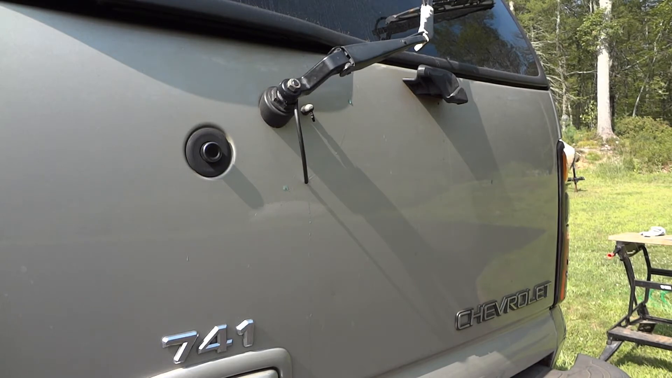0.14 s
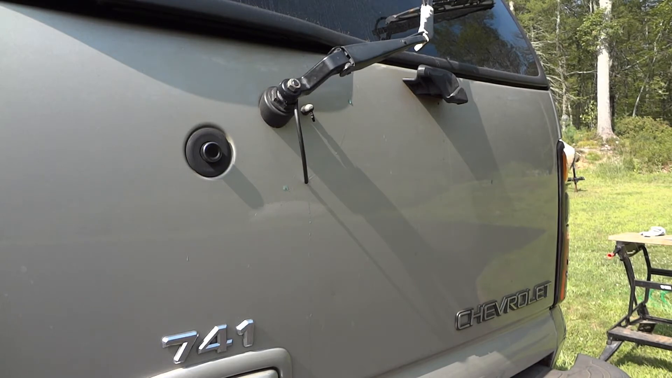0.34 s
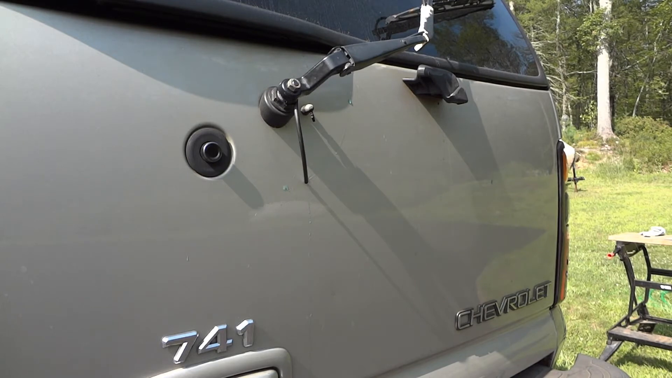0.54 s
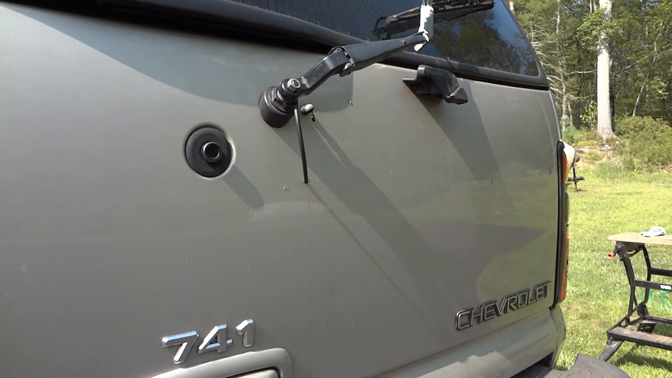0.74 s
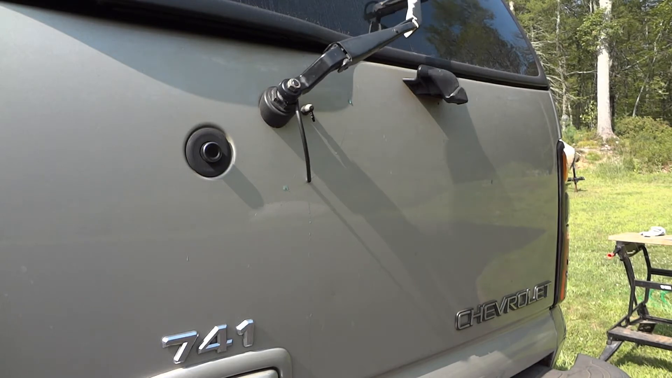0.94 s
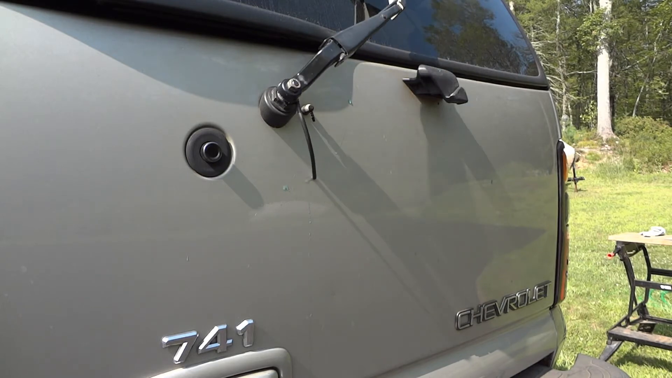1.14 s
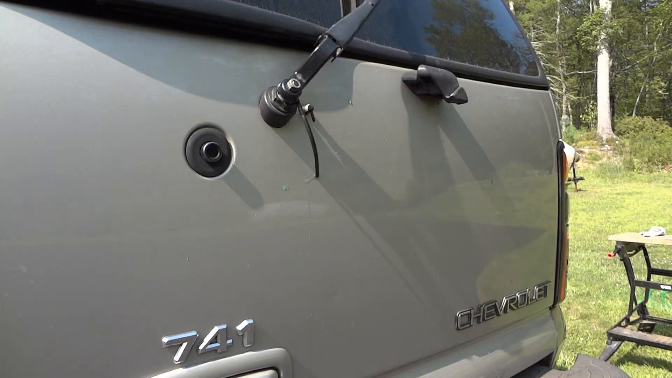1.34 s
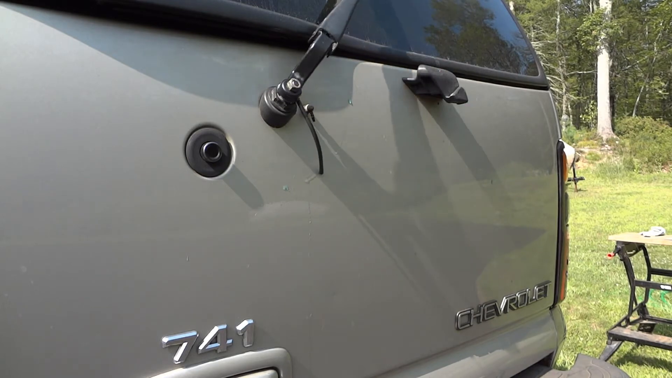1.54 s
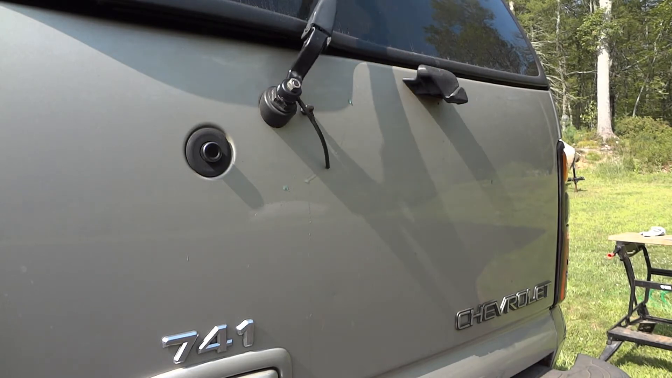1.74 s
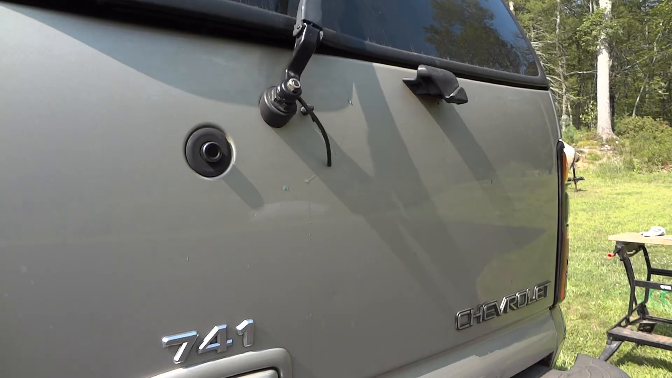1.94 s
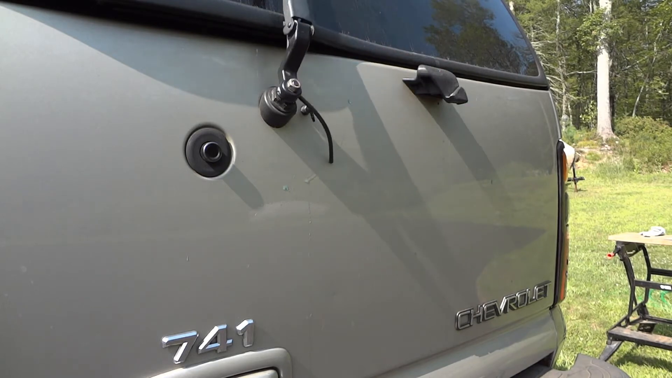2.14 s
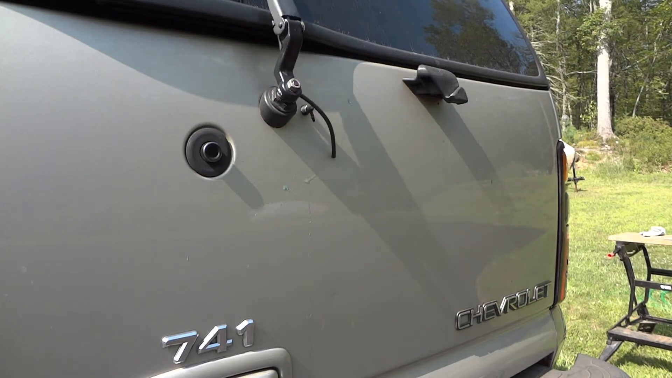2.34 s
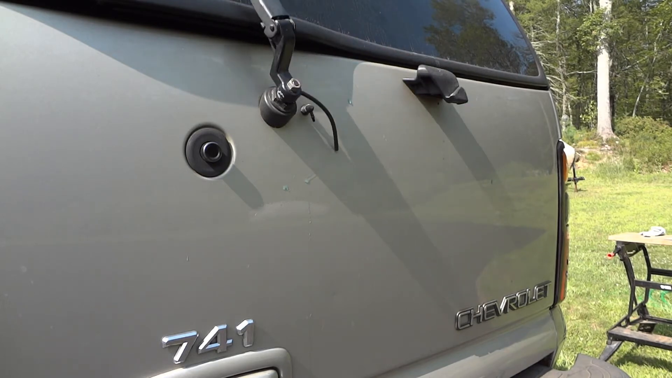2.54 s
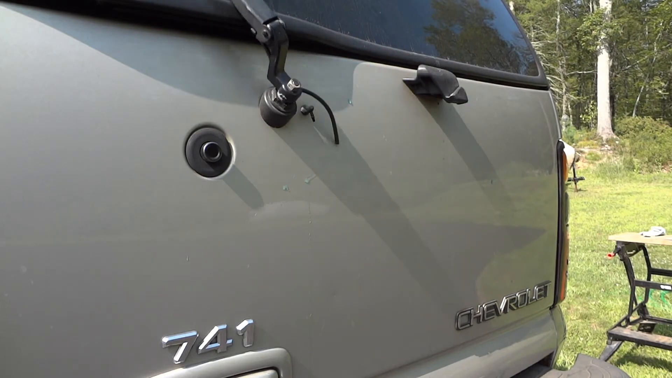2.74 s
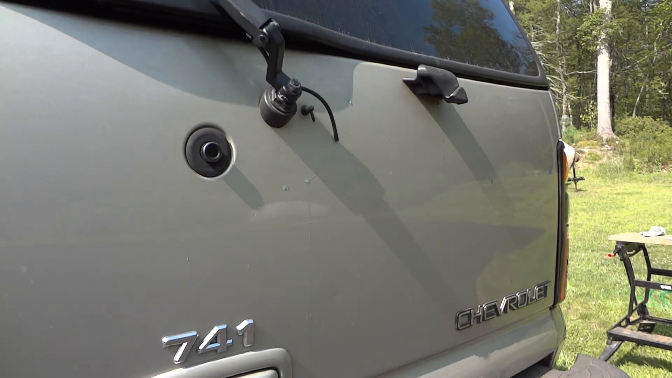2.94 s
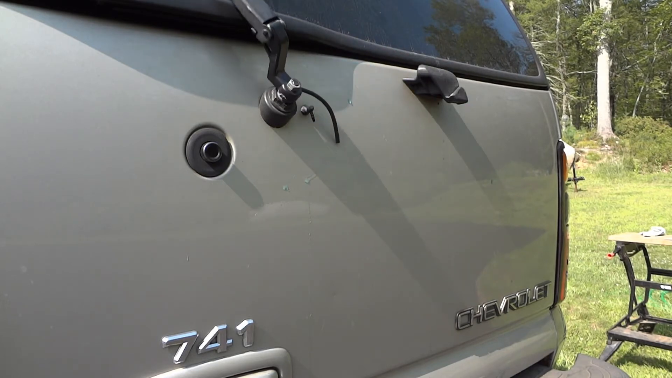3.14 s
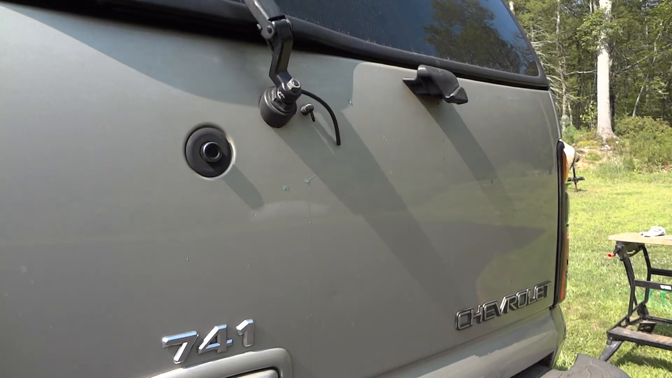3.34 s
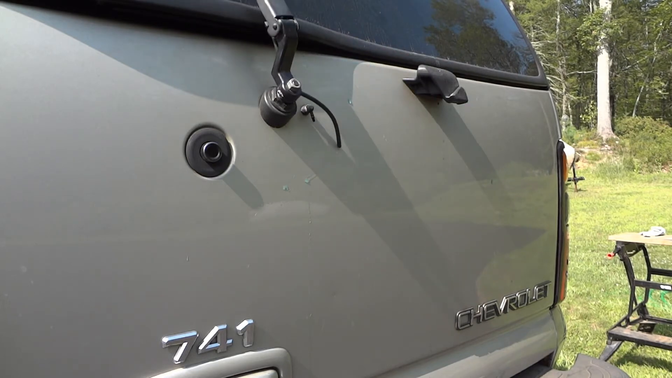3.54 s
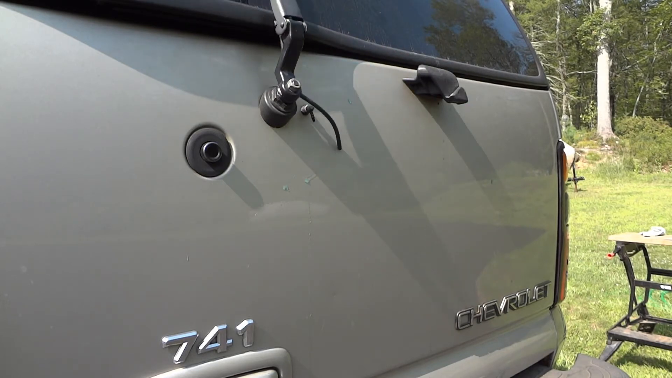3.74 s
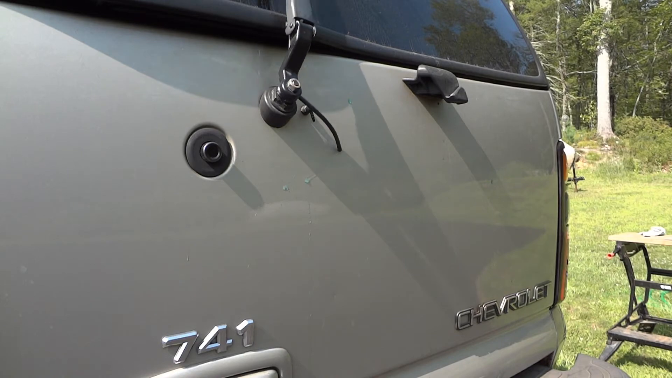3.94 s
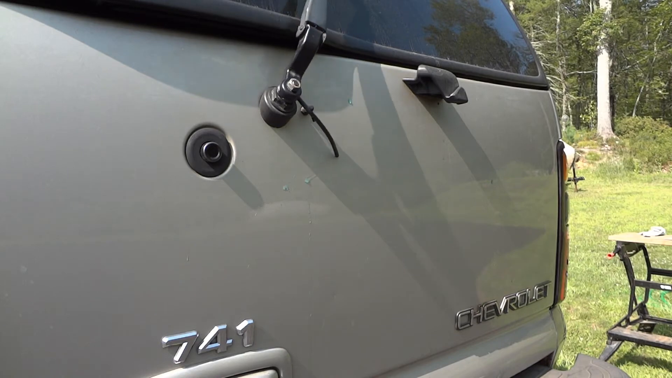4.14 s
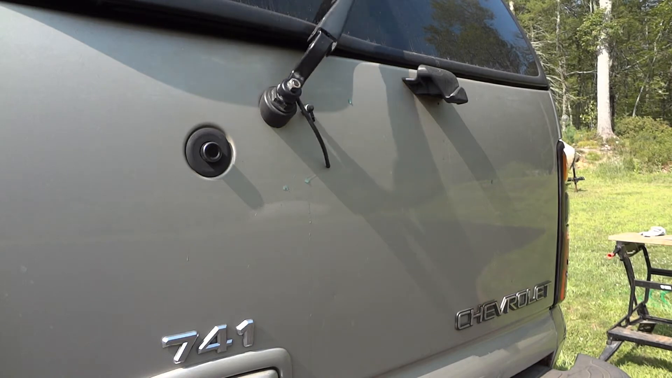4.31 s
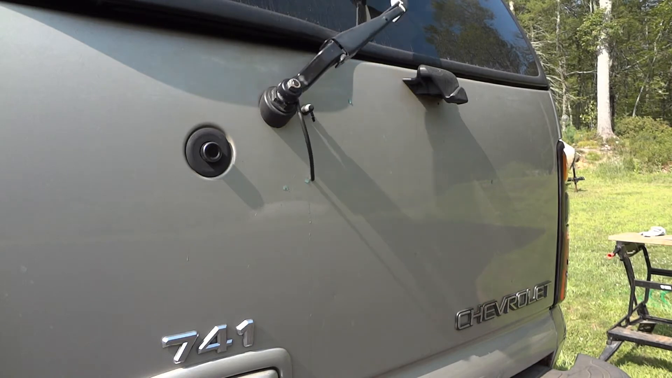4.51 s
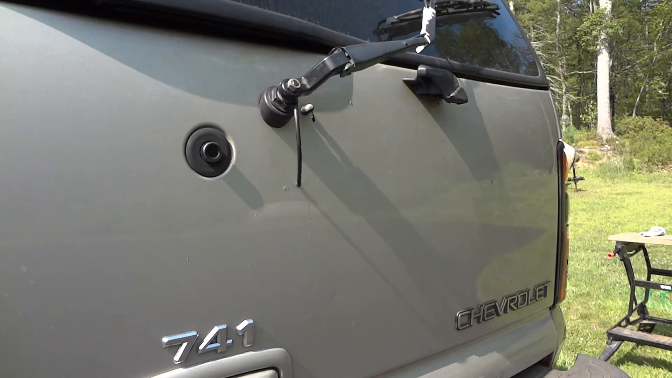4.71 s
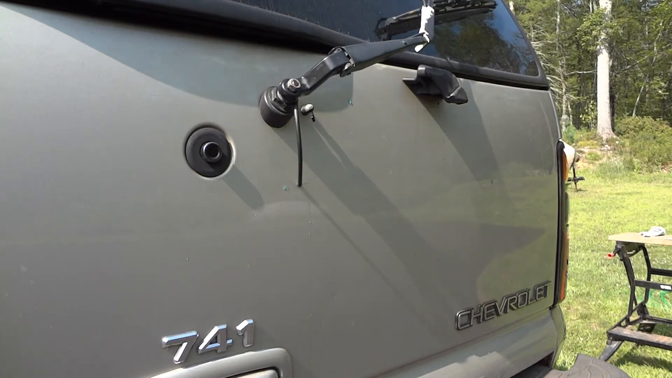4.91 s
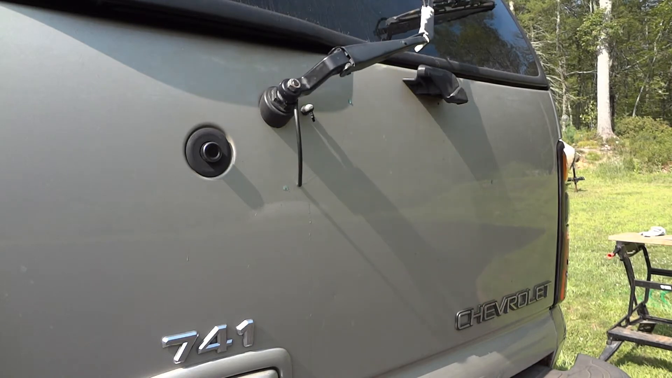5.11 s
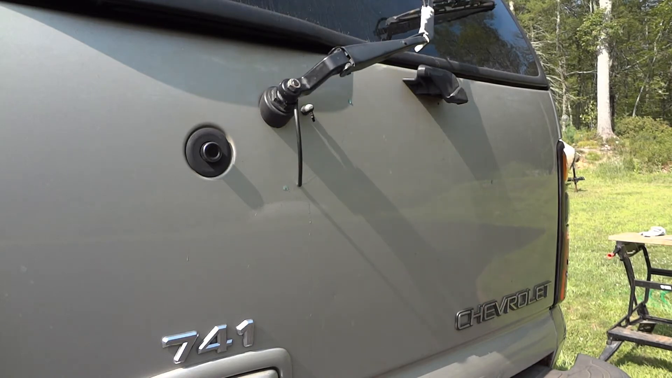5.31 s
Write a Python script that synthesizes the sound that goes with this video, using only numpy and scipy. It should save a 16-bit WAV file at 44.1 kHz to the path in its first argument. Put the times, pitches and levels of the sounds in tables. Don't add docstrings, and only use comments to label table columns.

```python
import sys
import numpy as np
from scipy import signal
from scipy.io import wavfile
from scipy.ndimage import uniform_filter1d

SR = 44100
rng = np.random.default_rng(int(sys.argv[2]) if len(sys.argv) > 2 else 0)


def volts_from_db(level):
    exponent = np.asarray(level, float) / 20
    return 10 ** exponent


def to_wav(s):
    ch = np.atleast_2d(s).T
    pcm = np.round(np.clip(ch, -1, 1) * 32767)
    wavfile.write(sys.argv[1], SR, pcm.astype(np.int16))


N = 241055
T = np.arange(N) / SR


def rms_one(x):
    return x / np.sqrt(np.mean(x ** 2) + 1e-20)


def column(rows, count):
    table = np.array(rows)
    return np.interp(T, table[:, 0], table[:, count])


def inside(t0, t1, edge_s):
    return np.clip(np.minimum(T - t0, t1 - T) / edge_s + .5, 0, 1)


def at_hz(points, hz):
    table = np.array(points)
    return np.interp(np.log(hz), np.log(table[:, 0]), table[:, 1])


def drift(rate_hz):
    r = np.exp(-80 * np.pi * rate_hz / SR)
    white = rng.standard_normal(N // 40 + 2002)
    slow = signal.lfilter([1], [1, -2 * r, r * r], white)[2000:]
    return np.interp(np.arange(N) / 40, np.arange(len(slow)), rms_one(slow))


def band(x, low_hz, high_hz, order=2):
    sos = signal.butter(order, [low_hz, min(high_hz, .45 * SR)], "band", fs=SR, output="sos")
    return signal.sosfilt(sos, x)


def ring(clicks, hz, t60_s):
    r = volts_from_db(-60 / (t60_s * SR))
    w = 2 * np.pi * hz / SR
    return signal.lfilter([0, np.sin(w)], [1, -2 * r * np.cos(w), r * r], clicks + 1e-18)


def pan(x, left_db):
    return np.array([x * volts_from_db(left_db / 2), x * volts_from_db(-left_db / 2)])


# pitch_hz, level_db
AIR_COLOUR = [(20, -18), (45, -7.5), (110, -1), (230, 2.5), (420, 3.5), (960, 3.5), (1900, -3), (3200, -7),
              (4200, -8.5), (6000, -11), (9000, -15.5), (11000, -13.5), (13500, -13), (17000, -16)]
# pitch_hz, left_right_likeness (-1 to 1)
AIR_LIKENESS = [(60, 0.83), (130, 0.98), (290, 0.55), (640, -0.5), (1410, -0.31), (3100, -0.17),
                (6820, 0.48), (15000, 0.65)]


def air():
    out, together = 0, drift(2.5)
    edges = 22 * 2 ** np.arange(0, 10, .5)
    white = rng.standard_normal((2, 2, N + 8000))
    for k, (low, high) in enumerate(zip(edges, edges[1:])):
        mid, side = band(white[k % 2], low, high)[:, -N:]
        hz = np.sqrt(low * high)
        alike = np.clip(at_hz(AIR_LIKENESS, hz), -1, 1)
        gain = volts_from_db(at_hz(AIR_COLOUR, hz) + .7 * (.5 * together + drift(10)))
        out = out + gain * (np.sqrt(1 + alike) * mid + np.sqrt(1 - alike) * side * [[1], [-1]])
    running_db = 1.48 * inside(0.99, 5.05, 0.42)
    return volts_from_db(-54.5 + running_db + 5.0) * rms_one(out)


# pitch_hz, level_db
WHINE_LINES = [(9830, -90), (12225, -89), (12290, -74), (13065, -82), (13486, -60), (15735, -92)]


def whine():
    out = 0
    for hz, db in WHINE_LINES:
        out = out + np.sqrt(2) * volts_from_db(db + 1.0 * drift(22)) * np.sin(2 * np.pi * hz * T)
    return out


def katydid():
    centre_hz, width_hz, throb_hz, level_db = 7940, 590, 9.9, -68
    throb = 1 + 0.24 * np.sin(2 * np.pi * np.cumsum(throb_hz + .5 * drift(1.6)) / SR)
    rasp = band(rng.standard_normal(N), centre_hz - width_hz / 2, centre_hz + width_hz / 2)
    return pan(volts_from_db(level_db + 2.7 * drift(30)) * throb * rms_one(rasp), -2.2)


# start_s, length_s, pitch_hz, width_hz, level_db
PIVOT_RUBS = [(2.467, .03, 1440, 30, -49), (2.468, .075, 2100, 2800, -50), (2.955, .05, 3000, 1600, -54),
              (2.04, .1, 1800, 2200, -59), (.1, .12, 640, 150, -59), (.86, .04, 500, 80, -57),
              (1.6, .13, 1150, 600, -56), (1.58, .3, 2800, 2000, -60), (4.375, .09, 2630, 50, -61.5),
              (4.47, .17, 2640, 60, -65.5), (4.645, .02, 2560, 120, -58), (4.27, .42, 3200, 1000, -59),
              (2.93, .17, 450, 700, -54), (4.66, .05, 145, 40, -42), (4.81, .17, 650, 800, -56),
              (0, .2, 240, 25, -57), (3.35, .4, 235, 25, -62)]


def squeaks():
    out, white = 0, rng.standard_normal(N)
    for s, length, hz, width, db in PIVOT_RUBS:
        rub = inside(s, s + length, .012) * band(white, hz - width / 2, hz + width / 2)
        out = out + volts_from_db(db) * rms_one(rub) * np.sqrt(length * SR / N)
    return out


# first_stroke_s, strokes (count), level_db, first_stroke_relative_db
NEAR_CHIRPS = [(.016, 1.2, -56, 1), (.233, 3.5, -49, .6), (.547, 3.5, -45, 1), (.875, 3.3, -42.5, -9),
               (1.18, 3.03, -40, -10), (1.517, 3.8, -38, -6.5), (1.802, 3.17, -38, -5.5),
               (2.091, 3.4, -39, -14), (2.448, 3, -38.5, -6), (4.708, 2.05, -41.5, 1.5),
               (5.067, 2.1, -40.5, -6), (5.269, 3.47, -43, -4.5)]


def near_cricket():
    stroke_s = .0352
    out = np.zeros(N)
    t = np.arange(int(.02 * SR)) / SR
    swell = np.sin(np.pi * t / t[-1]) ** 0.58
    for first_s, count, chirp_db, first_db in NEAR_CHIRPS:
        for k in range(int(count)):
            db = chirp_db + first_db * (k == 0)
            hz = 4753 + 4 * (db + 41.5)
            at = int((first_s + k * stroke_s - .007) * SR)
            tone = np.sin(2 * np.pi * (hz * 1.0314 * t - 5500 * t ** 2))
            out[at:at + len(t)] += volts_from_db(db) * swell * tone
    return out * volts_from_db(2.4 * drift(180))


def cricket_chorus():
    centre_hz, width_hz, throb_hz, level_db = 4753, 370, 60.1, -59
    throb = 1 + .8 * np.sin(2 * np.pi * np.cumsum(throb_hz + 2.5 * drift(2.5)) / SR)
    throb = throb * volts_from_db(1.5 * drift(4))
    far = band(rng.standard_normal((2, N)), centre_hz - width_hz / 2, centre_hz + width_hz / 2)
    lead = 1.2 * far.std() * np.sin(2 * np.pi * np.cumsum(centre_hz + 45 * drift(40)) / SR)
    choir = rms_one(lead + far[0] + 0.37 * far[1] * [[1], [-1]])
    return volts_from_db(level_db) * throb * choir * volts_from_db([[-2.2], [2.2]])


# start_s, period_s, pitch_hz, level_db
SECOND_TRILL = (4.723, .0335, 5760, -55)


def cricket_trill():
    start, period, hz, db = SECOND_TRILL
    phase = (T - start) / period % 1
    stroke = np.clip(1.6 * np.sin(np.pi * phase / .6), 0, 1) * (phase < .6)
    swell = inside(start, start + 9.8 * period, .002) * np.clip((T - start + .03) / .12, 0, 1)
    tone = np.sin(2 * np.pi * hz * T) + volts_from_db(-16) * np.sin(4 * np.pi * hz * T)
    return volts_from_db(db) * stroke * swell * tone


# time_s, friction_db, contact_resonance_hz
BLADE_STROKES = [
    [(1.17, -56, 7100), (1.246, -44.5, 7000), (1.45, -45, 8640), (1.75, -46, 7740), (2.0, -42.5, 6900),
     (2.2, -39.5, 7100), (2.42, -31.5, 7730), (2.6, -25.5, 7140), (2.955, -15, 6930)],
    [(3.077, -25, 6400), (3.16, -21, 6830), (3.25, -22, 7000), (3.5, -22.5, 7730), (3.74, -23.5, 7000),
     (3.88, -27.5, 6840), (4.016, -30.5, 6980), (4.346, -32.5, 7280), (4.46, -35.5, 6800)],
]
# start_s, length_s, hiss_db
JUDDER_BURSTS = [(.92, 0.081, -55), (1.007, 0.074, -56.5), (1.077, 0.032, -51), (1.12, 0.046, -59.5),
                 (1.588, 0.014, -52), (2.952, 0.017, -19.5), (2.974, 0.032, -22.5), (3.012, 0.017, -38.5),
                 (3.02, 0.012, -26), (3.033, 0.014, -33), (3.07, 0.018, -31), (4.459, 0.0905, -36.5),
                 (4.549, 0.023, -43), (4.576, 0.02, -36), (4.599, 0.023, -43.5), (4.621, 0.038, -39.5),
                 (4.66, 0.035, -47), (4.692, 0.13, -54.5), (4.859, 0.027, -50.5)]
# ratio_to_centre, level_db
LOWER_HISS = [(.15, -27.5), (.24, -31), (.33, -36), (.45, -22.5), (.55, -24), (.65, -14), (.75, -6),
              (.9, -1.5), (1.0, 0.5), (1.2, -2.5), (1.4, -6.5), (1.8, -17)]
# pitch_hz, level_db
MIDDLE_HISS = [(7500, -29), (9500, 0), (10800, -1), (12000, 1.5), (14000, -15)]
# pitch_hz, level_db
UPPER_HISS = [(10000, -31.5), (11800, -4.5), (13300, -0.5), (14500, -2.5), (15300, -9), (16500, -10)]


def blade():
    rows = np.vstack(BLADE_STROKES)
    force_db, centre = column(rows, count=1), column(rows, count=2)
    stiff_khz = (centre - 7100) / 1000
    sliding = sum(inside(stroke[0][0], stroke[-1][0], .008) for stroke in BLADE_STROKES)
    knee_db = -29.5
    lower = sliding * volts_from_db(force_db)
    sharpen = 0.034 * np.maximum(knee_db - force_db, 0)
    middle = lower * volts_from_db(-9 + 0.33 * (force_db + 23))
    upper = lower * volts_from_db(-1.1 + 2 * stiff_khz - 0.99 * np.maximum(force_db - knee_db, 0))
    for s, length, db in JUDDER_BURSTS:
        burst = inside(s, s + length, 0.0073) * volts_from_db(db)
        lower = lower + burst
        middle = middle + burst * volts_from_db(-9 + 0.6 * (db + 19))
        upper = upper + burst * volts_from_db(-5.5 - 0.33 * (db + 38))

    clumps = rms_one(uniform_filter1d(rng.standard_normal(N), size=30))
    slips = rng.standard_normal((2, N)) * volts_from_db(1.5 * clumps - 0.67 * drift(12.3))
    edges = np.r_[np.geomspace(900, 4000, 9)[:-1], np.arange(4000, 16801, 800)]
    out = 0
    for k, (low, high) in enumerate(zip(edges, edges[1:])):
        hz = np.sqrt(low * high)
        lower_db = at_hz(LOWER_HISS, hz / centre) * (1 + sharpen * (hz > centre))
        power = (lower * volts_from_db(lower_db + 7.5)) ** 2
        power += (middle * volts_from_db(at_hz(MIDDLE_HISS, hz) + 7.5)) ** 2
        power += (upper * volts_from_db(at_hz(UPPER_HISS, hz) + 7.5)) ** 2
        patchy = volts_from_db(1.0 * drift(15.0))
        out = out + np.sqrt(power) * patchy * band(slips[k % 2], low, high, order=3)

    scatter = band(np.roll(out, 131) - np.roll(out, 290), 3000, 7800) * volts_from_db(-21.5)
    nearness = np.clip(1 - np.abs(T - 3.11) / 0.67, 0, 1)
    left_db = 1.6 + (4 - 1.6) * nearness
    return pan(out, left_db) + scatter * [[1], [-1]]


# start_s, length_s, pitch_hz, start_level_db, end_level_db
MOTOR_SURGES = [(0.938, 0.048, 191, -54, -57), (1.06, 0.034, 191.8, -51, -57),
                (1.138, 0.079, 190.3, -53.5, -59.5), (1.255, 0.2, 186, -55.5, -55),
                (1.494, .15, 191, -54, -52.5), (2.586, 0.14, 173.3, -55, -61), (2.72, .22, 164.7, -65, -62),
                (2.963, 0.035, 177.5, -46, -48), (3.012, 0.097, 179, -48, -55),
                (4.165, 0.16, 175.2, -54, -55), (4.341, 0.316, 187, -53, -41.5),
                (4.675, .03, 184.6, -46, -51), (4.718, 0.086, 189.7, -43.5, -42),
                (4.823, 0.15, 188, -37.5, -43), (5.0, 0.066, 185.5, -48, -43.5)]


def motor():
    pitch = column([(s + length / 2, hz) for s, length, hz, _, _ in MOTOR_SURGES], count=1)
    load = 0
    for s, length, _, first_db, last_db in MOTOR_SURGES:
        level_db = np.interp(T, [s, s + length], [first_db, last_db])
        load = load + inside(s, s + length, .02) * volts_from_db(level_db)
    return np.sqrt(2) * load * volts_from_db(1.0 * drift(30)) * np.sin(2 * np.pi * np.cumsum(pitch) / SR)


# start_s, peak_db, bracket_share_db (400-1200 Hz)
LINKAGE_BLOWS = [(0.941, -42, -9), (1.597, -74, -3), (2.466, -31.5, -16), (2.949, -41.5, 10.5),
                 (2.966, -24.5, -14), (2.994, -30, -11), (4.082, -31, -28), (4.369, -43, -5),
                 (4.561, -26, -11.5), (4.586, -26.5, -20), (4.655, -19, -14.5), (4.827, -22.5, -17.5),
                 (4.858, -24.5, -15), (4.901, -23.5, -17), (4.929, -30, -18), (5.015, -27.5, -18)]
# pitch_hz, level_db, t60_s
DOOR_SKIN = [(70, -2, 0.026), (109.4, -2.5, 0.027), (154.8, -4.5, 0.13), (219, -7, 0.11), (328, -14, 0.17)]
# pitch_hz, level_db, t60_s
MOTOR_BRACKET = [(421, 1.5, 0.076), (461, 4, 0.053), (637, 5.5, 0.021), (917, 9, 0.022),
                 (1058, -3.5, 0.064), (1440, -30, .06), (2010, -8, .03)]


def thumps():
    rows, out = np.array(LINKAGE_BLOWS), 0
    at = (rows[:, 0] * SR).astype(int)
    rattle = volts_from_db(-16 - 20 * np.arange(4000) / SR / 0.077)
    skin_db = rows[:, 1] - 9
    bracket_db = rows[:, 1] + rows[:, 2] - 10
    for modes, db, soft in ((DOOR_SKIN, skin_db, 120), (MOTOR_BRACKET, bracket_db, 24)):
        scatter_db = rng.normal(0, 2.5, (len(at), len(modes)))
        contact = np.hanning(soft) / np.hanning(soft).sum()
        for k, (hz, level_db, t60) in enumerate(modes):
            blows = np.zeros(N)
            blows[at] = volts_from_db(db + level_db + scatter_db[:, k]) * (-1) ** k
            grains = rng.standard_normal(N) * (rng.random(N) < 1500 / SR)
            loose = grains * signal.oaconvolve(blows, rattle)[:N]
            out = out + ring(signal.oaconvolve(blows + loose, contact)[:N], hz, t60)
    return signal.sosfilt(signal.butter(3, 105, "high", fs=SR, output="sos"), out)


# start_s, peak_db, centre_hz, t60_s, ringing_share (0-1)
LINKAGE_TICKS = [(4.368, -42, 2000, .02, .1), (4.652, -23, 16000, .01, .05), (4.865, -35, 11000, .004, .02),
                 (4.929, -41, 5600, .008, .2), (4.9322, -27, 4850, .026, .6), (4.932, -39, 2400, .015, .15),
                 (4.933, -44, 8000, .03, .2), (5.011, -25, 4400, .009, .08), (5.013, -39, 4900, .04, .3),
                 (5.012, -46, 10000, .03, .3), (5.09, -29, 17500, .004, .02)]


def ticks():
    out, t = np.zeros(N), np.arange(3000) / SR
    for s, db, hz, t60, share in LINKAGE_TICKS:
        white = rng.standard_normal(len(t))
        puff = band(white * volts_from_db(-60 * t / t60), hz / 1.9, hz * 1.9)
        ringing = ring(white * volts_from_db(-60 * t / .004), hz, t60)
        crack = (1 - share) * puff + share * ringing
        at = int(s * SR)
        out[at:at + len(t)] += volts_from_db(db) * crack / np.abs(crack).max()
    return out


def scene():
    crickets = pan(near_cricket(), -6.5) + pan(cricket_trill(), 1.5) + cricket_chorus()
    outdoors = air() + whine() + katydid() + crickets
    door = pan(motor() + thumps(), 3.3) + pan(ticks() + squeaks(), 2.5)
    return outdoors + blade() + door


def top_cut(x):
    return signal.sosfilt(signal.butter(12, 16440, fs=SR, output="sos"), x)


def record(dry):
    steep = signal.ellip(14, .5, 62, 15760, fs=SR, output="sos")
    return top_cut(signal.sosfilt(steep, dry))


dry = scene()
out = record(dry)
to_wav(out)
```